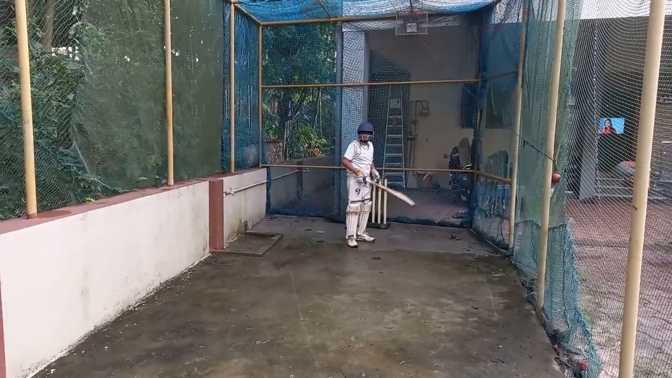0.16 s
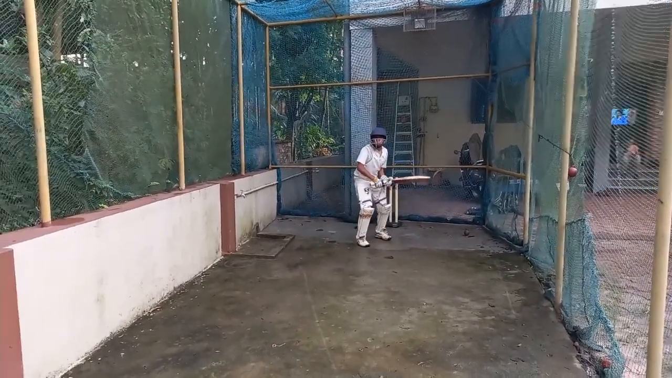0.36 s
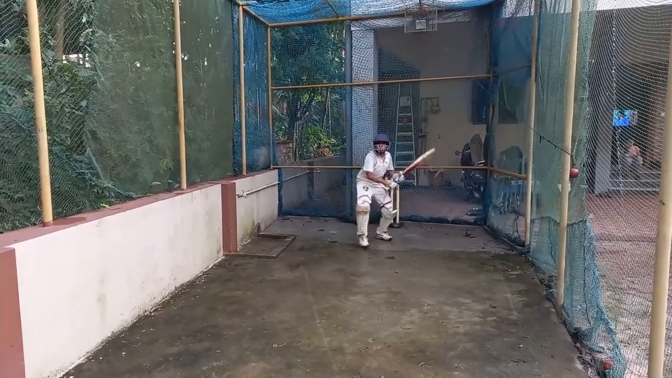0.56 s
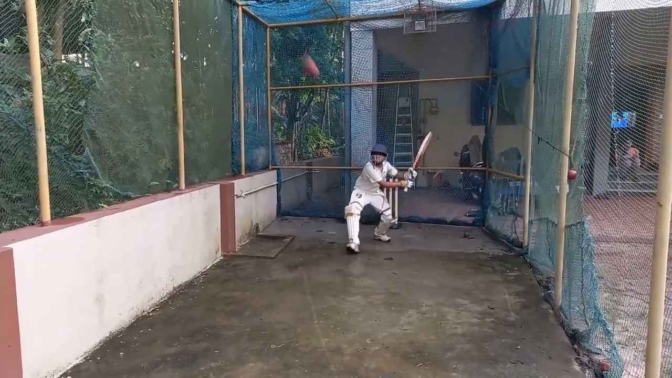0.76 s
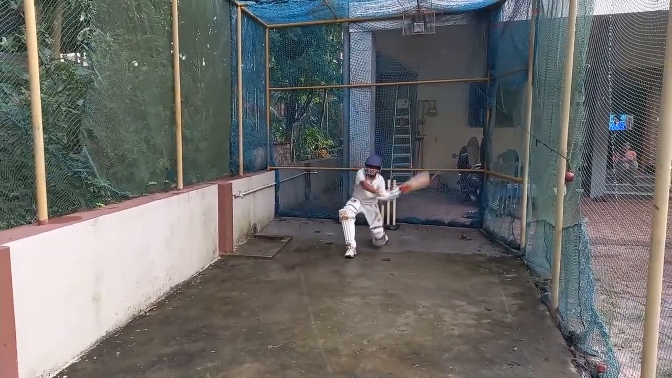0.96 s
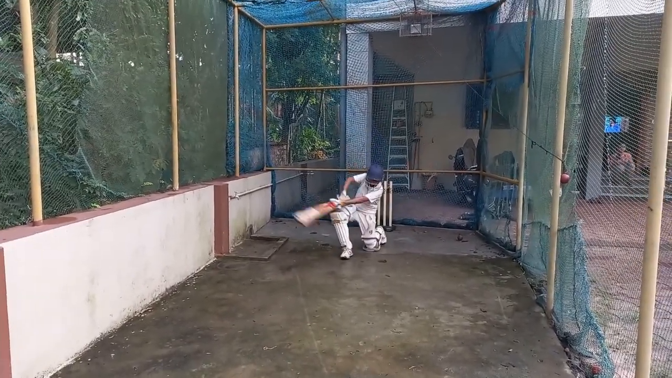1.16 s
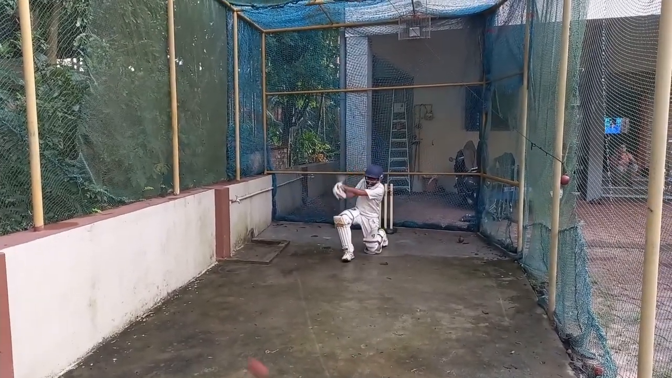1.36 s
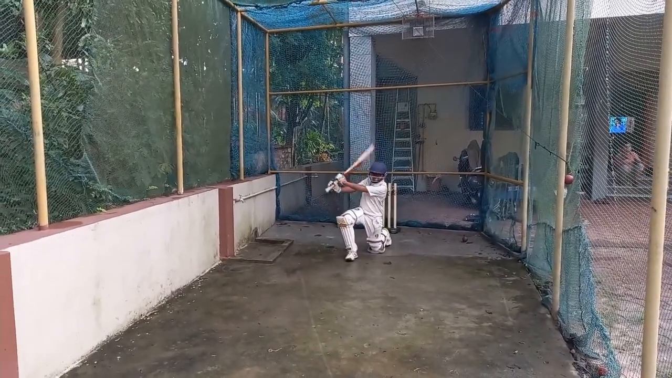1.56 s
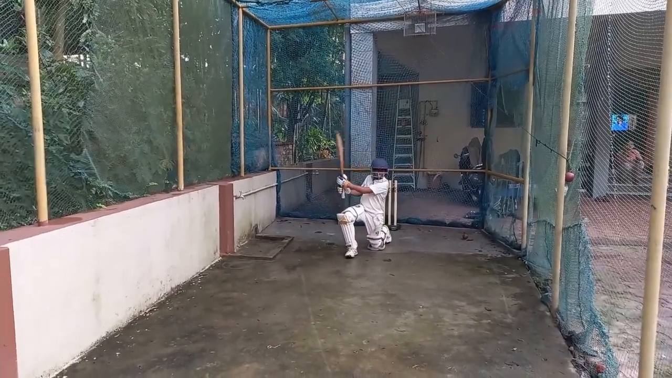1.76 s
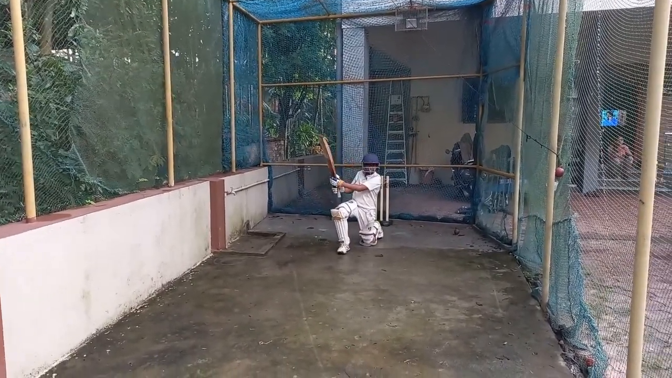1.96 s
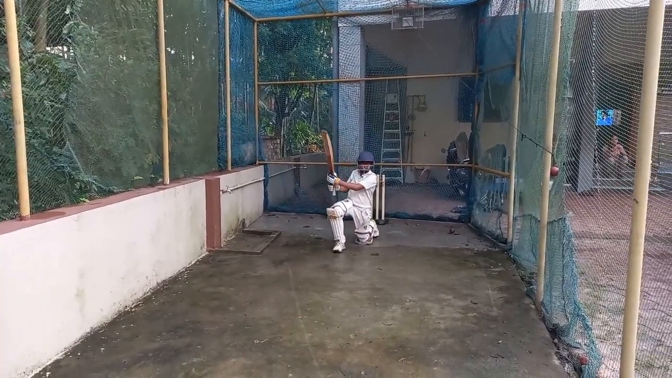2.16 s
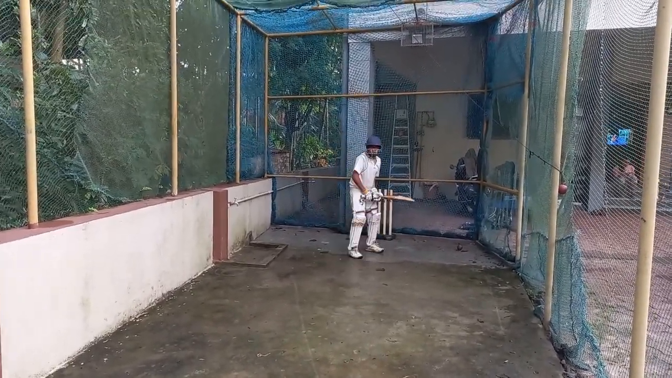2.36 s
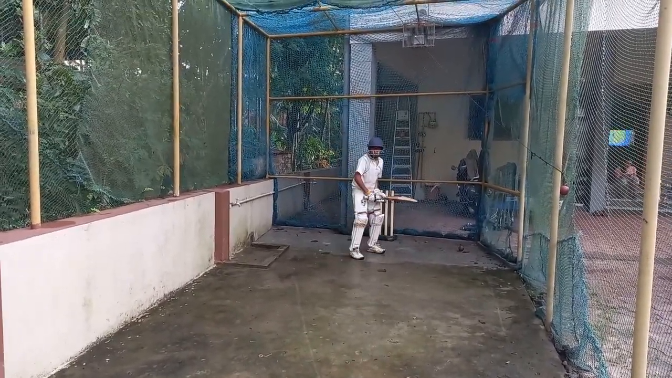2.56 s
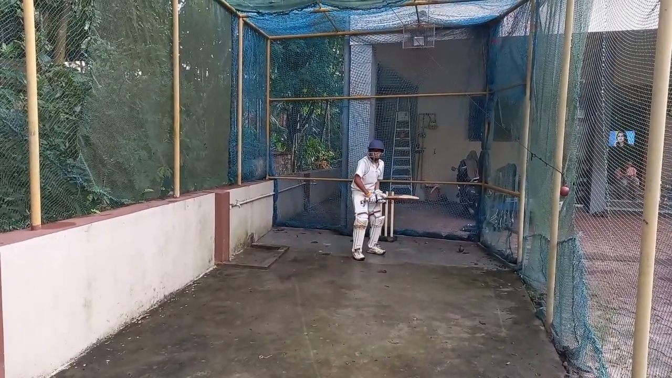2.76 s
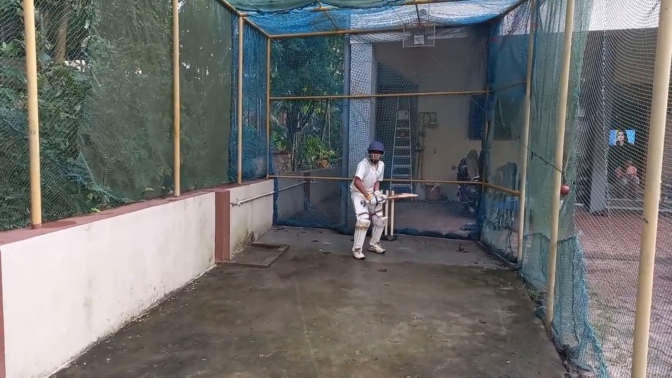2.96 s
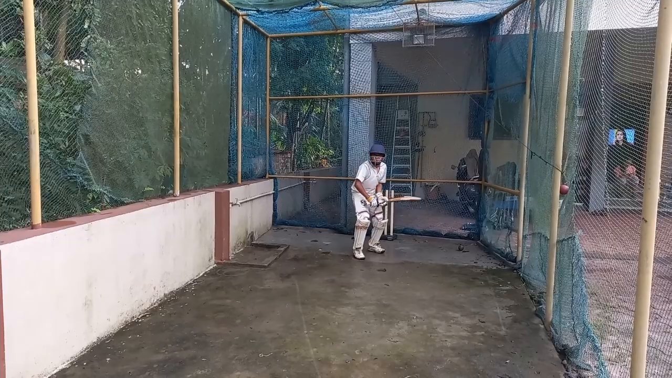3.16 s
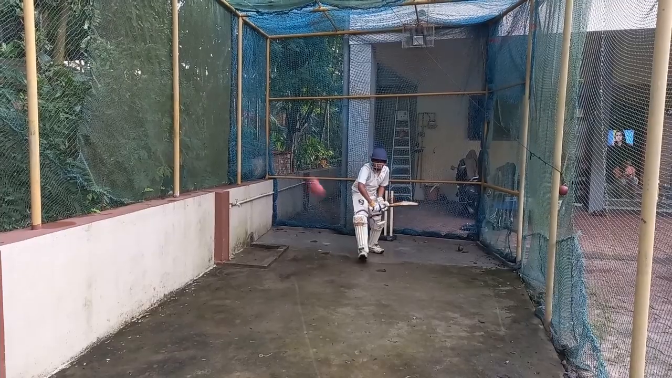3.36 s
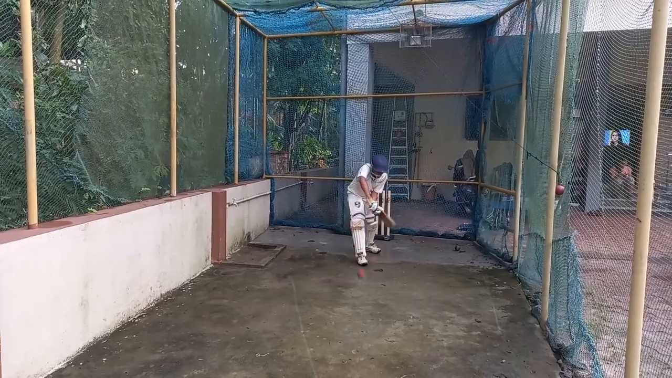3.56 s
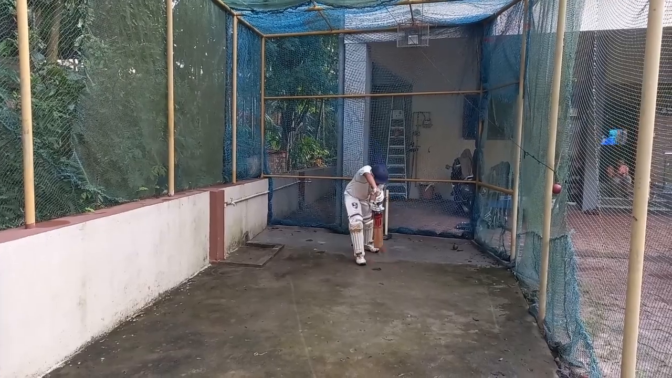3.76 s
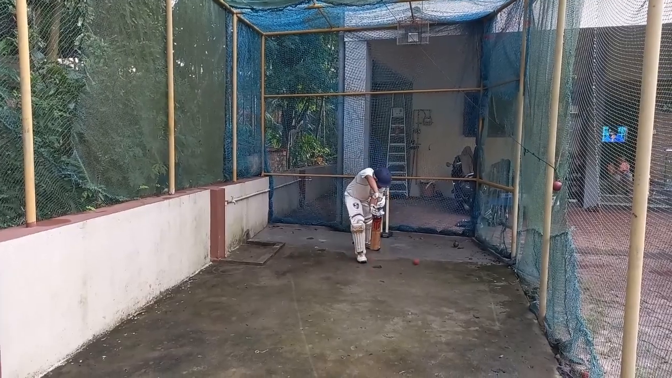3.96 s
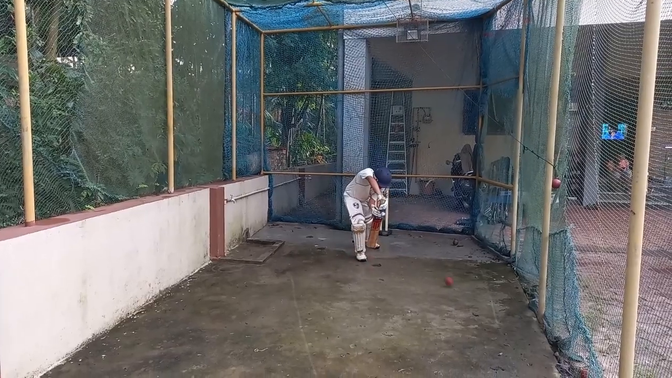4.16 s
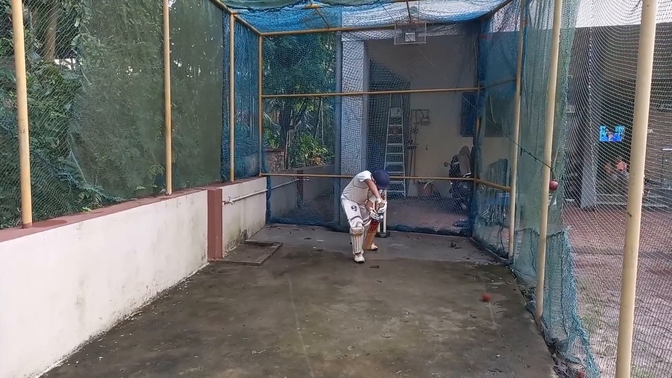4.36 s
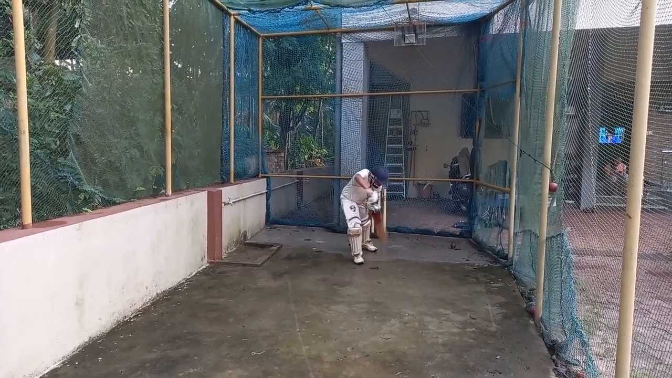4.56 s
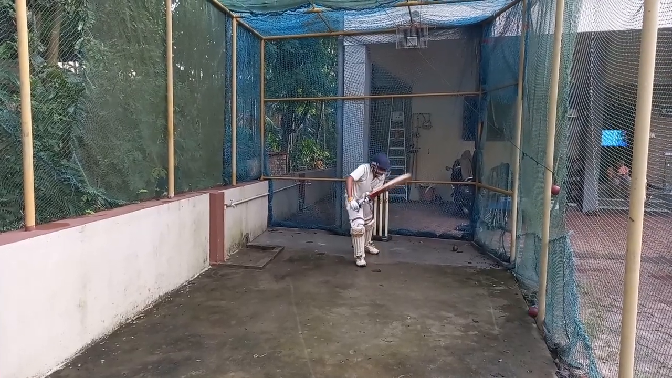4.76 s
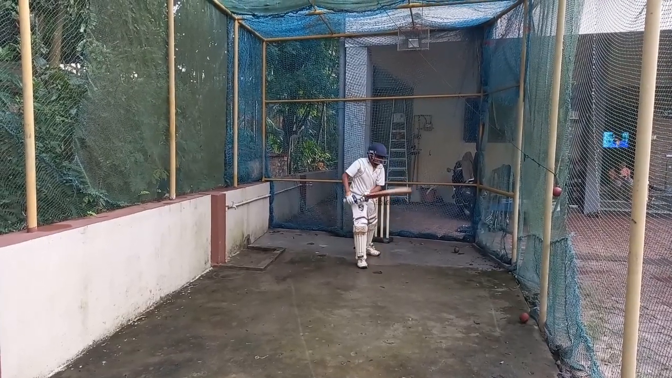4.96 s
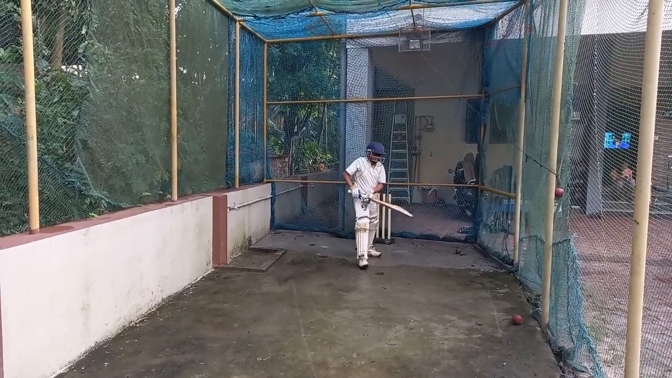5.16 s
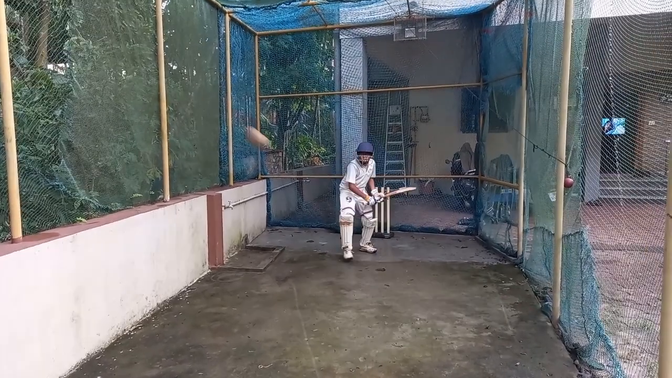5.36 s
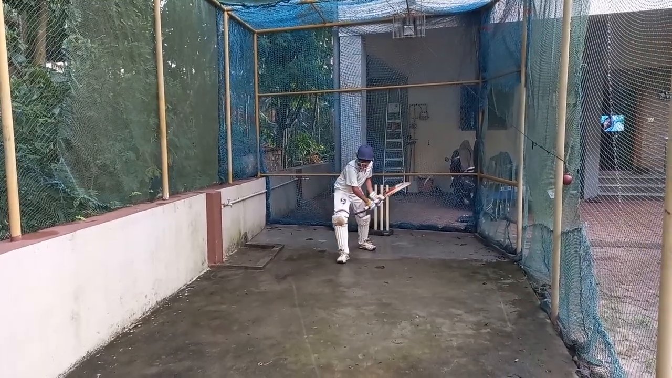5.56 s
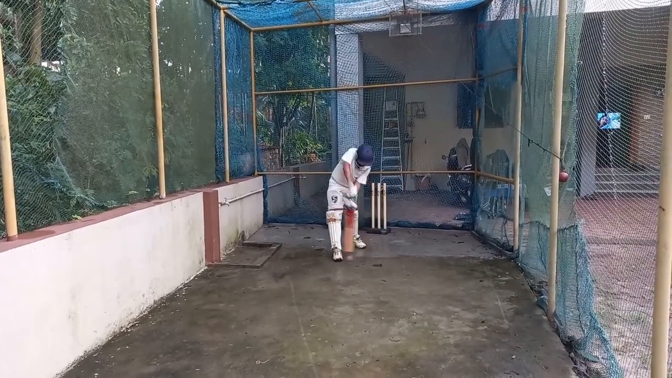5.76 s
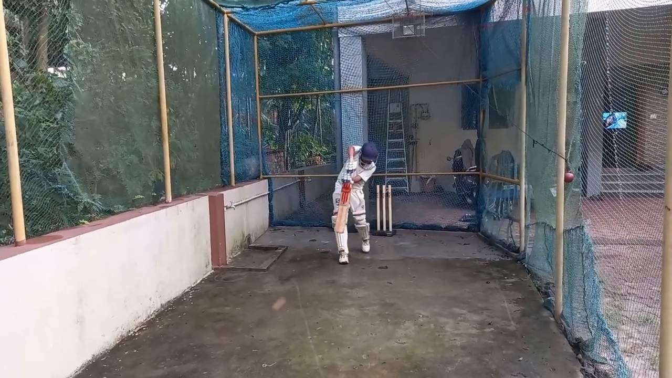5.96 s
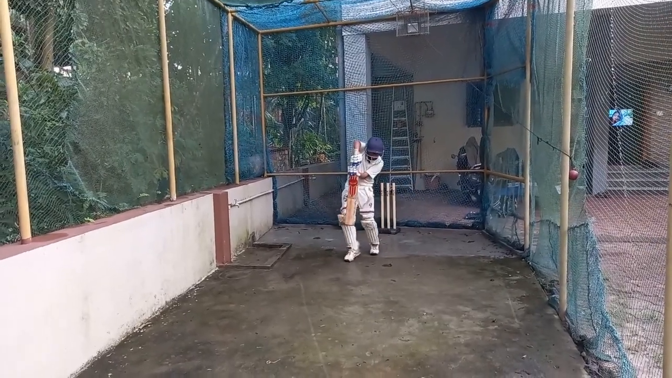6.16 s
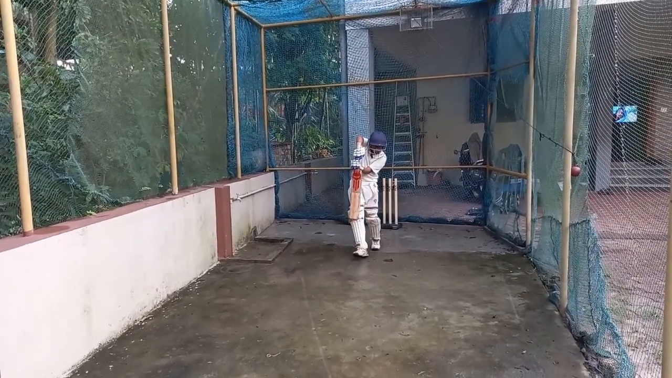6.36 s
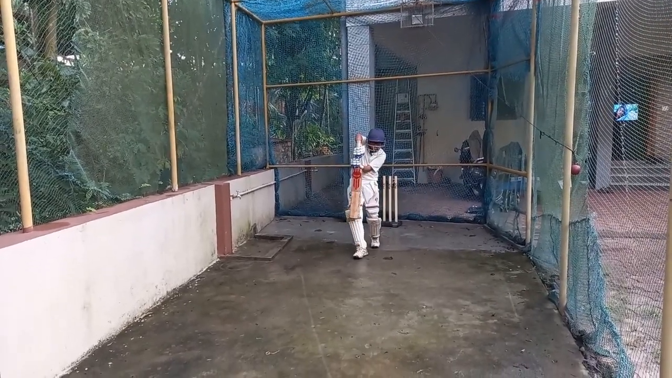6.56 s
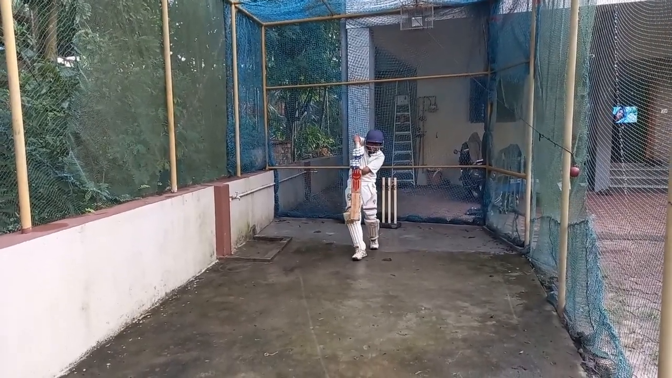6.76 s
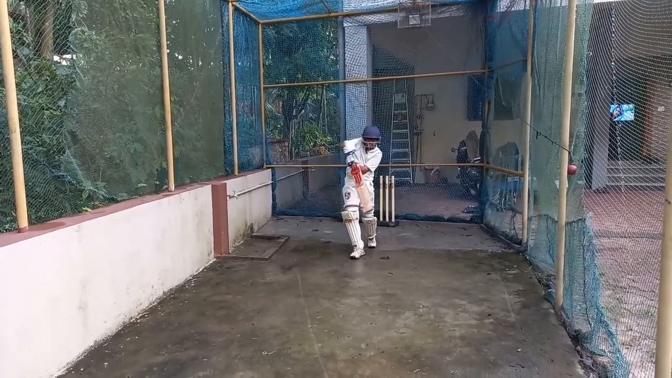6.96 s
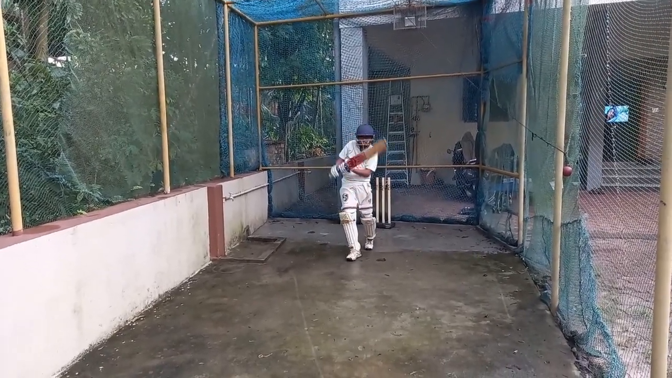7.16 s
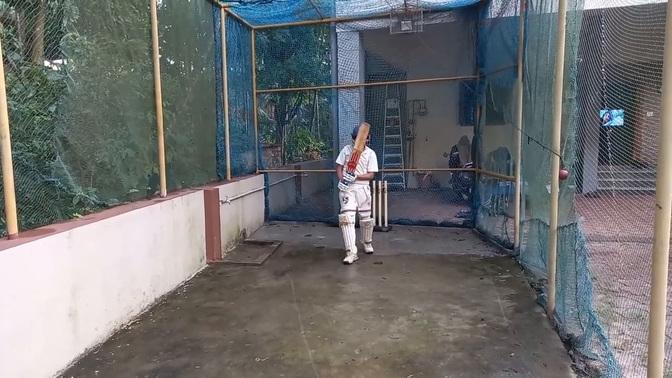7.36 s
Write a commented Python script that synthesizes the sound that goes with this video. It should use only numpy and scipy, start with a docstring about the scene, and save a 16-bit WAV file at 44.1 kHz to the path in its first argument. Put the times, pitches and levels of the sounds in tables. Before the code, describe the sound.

In a netted concrete practice lane outdoors, a far bat knocks faintly, then a near wooden bat cracks a hard ball, which bounces quickly away. Two more dry, woody cracks follow, each with wall slap and a short tail. Distant blurred whistles come after the second; scuffs, taps and low heel thuds close. Fixed stereo microphone some metres away, over quiet traffic, leafy air and insect hiss.

```python
"""A bat cracks against a ball in a netted practice lane with a concrete floor, and the ball bounces.
Blows and bounces are damped modes with a bright contact snap and a slab boom; a bat also sounds in a farther lane.
Heels thud as low modes, shoes and kit tap, and soles, pads and the swung bat rustle as grainy noise.
Wall echoes and a noise tail answer the blows, bounces, taps and whistles. Blurred tones whistle far off,
behind them shaped noise makes the traffic hum, leafy air and insect hiss."""
import sys
import numpy as np
from scipy import signal
from scipy.fft import rfft, irfft, next_fast_len
from scipy.io import wavfile
from scipy.ndimage import uniform_filter1d, map_coordinates

SR = 44100
rng = np.random.default_rng(int(sys.argv[2]) if len(sys.argv) > 2 else 0)


def wrap_up_sound(samples):
    """Save the sound to the file named by the first command line argument, as 16-bit audio."""
    columns = np.atleast_2d(samples).T
    # keep every value between -1 and 1, then stretch to whole-number steps
    tamed = np.clip(columns, -1, 1)
    steps = np.round(tamed * 32767).astype(np.int16)
    wavfile.write(sys.argv[1], SR, steps)


N = 325987


def bat_blows(out):
    """Modal excitation: the sharpness of the contact selects which modes of the blade sound."""
    # bat on ball: (time [s], body peak [dB], contact sharpness [Hz], crack [dB], crack tilt [dB/octave],
    # slab boom [dB], near echo delay [ms], near echo [dB], yard tail [dB], far walls [dB],
    # left over right [dB], left lag [ms])
    blows = [(1.148, -4.5, 950, 7.5, 1.5, -23, 3.8, 0, 4.5, 3.5, 0, 0.19),
             (3.811, 0, 820, 0.5, -1.5, -27, 3.7, -6, -8, 2, -1, -0.16),
             (5.8045, 1, 1300, -1, 2.5, -31, 3.7, -11, -1.5, 0, 0, 0.14)]
    # modes of the wooden blade: (frequency [Hz], level [dB], t60 [s])
    willow = [(296, 3, 0.0076), (450.5, 1, .01), (663, 0, 0.01), (1105, 4, 0.0051), (1397, -0.5, .005),
              (2260, -14, 0.0017)]
    for s, db, sharp_hz, *rest in blows:
        blade = np.zeros(SR // 4)
        for hz, mode_db, t60 in willow:
            octaves_off = np.log2(hz / sharp_hz)
            blade += amp(mode_db - 6 * octaves_off ** 2) * ring(hz, t60, 0.0026)
        strike(out, s, db, -blade, *rest)


def ball_bounces(out):
    """Heavily damped resonance: each bounce is a hollow knock of two modes lasting a few cycles."""
    # ball on floor, wall and posts: (time [s], body peak [dB], knock pitch [Hz], crack [dB],
    # crack tilt [dB/octave], slab boom [dB], near echo delay [ms], near echo [dB], yard tail [dB],
    # far walls [dB], left over right [dB], left lag [ms])
    bounces = [(1.2699, -6.5, 500, 11, -6, -17, 7, -14, -7.5, -2, -0.5, 0.2),
               (1.298, -21, 620, 19, -9.5, -8, 4, -17, -6, -4, -3.5, 0.14),
               (1.639, -18.5, 320, 1.5, 2.5, -32, 9, -11, -12, -6, -2.5, 0.11),
               (1.7098, -10, 680, 3.5, -2.5, -24, 10.5, -12, -12, -3, -1.5, 0.27),
               (2.1674, -26, 440, 5.5, -1.5, -26, 4, -8, -11, -5, -2, -0.22),
               (3.6799, -19.5, 470, 3, 1, -29, 4, -3, 1, 1, -1, -0.45),
               (3.9077, -13, 440, -4, 1, -26, 4, -5.5, -8, -6, -1, -0.3),
               (4.255, -28, 380, -30, 1, -33, 5, -9, -3, -5, -2, -0.26),
               (5.7785, -11, 750, 0, -2, -24, 4, -5, -2, -4, -4, -0.039),
               (6.5401, -30, 600, 11, -3, -35, 4, -10.5, -13, -5, 1.5, 0.36)]
    for s, db, hz, *rest in bounces:
        t60 = 4 / hz
        knock = ring(hz, t60, .8 / hz) + .3 * ring(1.7 * hz, t60, .5 / hz)
        strike(out, s, db, -knock, *rest)


def far_bat(out):
    """Reverberant field: a bat in a farther lane is heard mostly through the walls, as a hollow colour."""
    # one blow: time [s], level [dB], then its colour as rows of (frequency [Hz], level [dB])
    far_blow = (.403, -26, [(200, -27), (340, -12.5), (445, 4), (560, -6), (710, -1), (830, -19),
                (1000, -14), (1400, -24), (1800, -48.5), (5000, -53)])
    s, db, colour = far_blow
    click = filtered(np.arange(SR // 20) == 400, lambda hz: amp(along(colour, hz)))
    click /= np.abs(click).max()
    answered = yard(0.41 * click, click, wet_db=17.5, slow=1.56, early=0.54)
    add(out, s - .009, amp(db) * answered)  # the click is centred 9 ms into its buffer


def strike(out, s, db, body, crack_db, tilt_db, boom_db, echo_ms, echo_db, wet_db, facade_db, pan_db, lag_ms):
    """Impact: body ring and contact snap radiate into the yard while the slab booms."""
    body = body / np.abs(body).max()
    snap, click = amp(crack_db) * burst(.005, tilt_db)
    feed = smooth(body) + 0.72 * click
    answered = yard(body + snap, feed, wet_db, lag_ms, echo_db, echo_ms, facade_db)
    add(out, s, amp(db) * answered, pan_db)
    add(out, s, amp(db + boom_db) * slab_boom(), pan_db=0)


def slab_boom():
    """Diffuse low vibration: the struck slab gives a decaying band of bass noise."""
    # slab spectrum, relative: (frequency [Hz], density [dB per Hz])
    slab = [(25, -45), (55, -15), (82, 0), (105, -6), (140, -6), (220, -20), (400, -60)]
    t60_s, rise_s, likeness = .38, .008, .75
    t = np.arange(SR // 2) / SR
    boom = unit(paired(rng.standard_normal((2, len(t))), [(100, likeness)], slab))
    return amp(-60 * t / t60_s) * (1 - np.exp(-t / rise_s)) * boom


def burst(t60, tilt_db=0):
    """Hard contact excites a wide band: a noise snap, and a click of equal energy without its chance ripples."""
    # contact colour before the tilt: (frequency [Hz], level [dB])
    crack = [(600, -29), (1800, 2), (3000, 1), (4200, -1), (6200, -1.5), (8000, -8.5), (11000, -8),
             (16000, -17)]
    t = np.arange(SR // 4) / SR

    def colour(hz):
        octaves = np.log2((hz + 1) / 4000)
        return amp(along(crack, hz) + tilt_db * octaves)

    snap = unit(filtered(rng.standard_normal(len(t)) * amp(-60 * t / t60), colour))
    click = unit(filtered(np.arange(len(t)) == 200, colour))
    return np.array([snap, click]) / 70


def ring(hz, t60, attack):
    """Damped mode: a sine that builds up, then decays exponentially, a quarter of a second long."""
    t = np.arange(SR // 4) / SR
    return np.sin(2 * np.pi * hz * t) * amp(-60 * t / t60) * (1 - np.exp(-t / attack))


def smooth(knock):
    """Scattering evens out fine spectrum: a click with only the broad colour of the knock."""
    power = uniform_filter1d(np.abs(rfft(knock)) ** 2, size=40)
    return np.roll(irfft(np.sqrt(np.abs(power)), len(knock)), 200)


def yard(knock, feed, wet_db, lag_ms=0, echo_db=-8, echo_ms=3.7, facade_db=-5, slow=1, early=0.58):
    """Reflection and reverberation: discrete echoes of the knock, and a fresh lumpy tail of the feed."""
    # decay of the tail before the factor slow: (frequency [Hz], t60 [s])
    yard_decay = [(60, 0.73), (250, 0.66), (700, 0.71), (2000, 0.71), (6000, 0.67), (15000, 0.58)]
    # left-right likeness of the tail: (frequency [Hz], likeness [0-1])
    tail_likeness = [(100, 0.93), (500, 0.84), (1500, 0.056), (5000, 0.049)]
    # wall echoes before the tail and far-wall levels are added: (time [s], level [dB])
    wall_echoes = [(.018, -24.5), (0.043, -17.5), (.0455, -11), (.048, -8), (.051, -16), (.072, -13.5)]

    hz, t, z = signal.stft(rng.standard_normal((2, SR)), SR, nperseg=256)
    rise = 1 - (1 - early) * np.exp(-(t / 0.028) ** 2)  # builds up as the far buildings answer
    # single surfaces, above all one large facade, stand out
    facade_bump = max(3 + facade_db, 0) * np.exp(-((t - .046) / 0.0046) ** 2)
    lumps = amp(2.4 * rng.standard_normal(len(t)) + facade_bump)
    decay = amp(-60 * t / slow / along(yard_decay, hz)[:, None])
    tail = signal.istft(z * rise * lumps * decay, SR, nperseg=256)[1]
    tail = paired(tail, tail_likeness, [(100, 0)])
    tail = amp(wet_db) * tail / np.linalg.norm(tail[0])

    far = np.zeros_like(tail)
    for s, db in wall_echoes:
        scatter = rng.integers(-12, 13, size=2)  # samples, left and right apart
        far[[0, 1], round(s * SR) + scatter] += amp(db + wet_db + facade_db)
    paths = filtered(far, lambda hz: 1 / (1 + (hz / 1400) ** 2))  # rough walls return little treble
    lag = round(lag_ms * SR / 1000)
    paths[[0, 1], [max(lag, 0), max(-lag, 0)]] += 1  # direct sound
    paths[[0, 1], round(echo_ms * SR / 1000) + rng.integers(-6, 7, size=2)] += amp(echo_db)
    echoes = signal.fftconvolve(knock[None], paths, axes=1)
    return echoes + signal.fftconvolve(feed[None], tail, axes=1)


def footsteps(out):
    """Low modal impact: each heel on the concrete is two damped modes."""
    # heels: (time [s], level [dB], pitch [Hz], t60 of the lower mode [s])
    steps = [(2.568, -40, 92.9, 0.17), (6.142, -25.5, 94, 0.15), (6.221, -27, 88, 0.09),
             (6.335, -26, 99, 0.15), (6.92, -42.5, 96, 0.21), (7.114, -18.5, 98.3, 0.093),
             (7.301, -18.5, 95, 0.088), (7.348, -27, 96, 0.13)]
    for s, db, hz, t60 in steps:
        thud = ring(hz, t60, 0.014) + 0.48 * ring(1.54 * hz, 0.32 * t60, 0.0038)
        add(out, s, amp(db) * thud)


def taps(out):
    """Light contact: shoes and kit give a broadband snap over a short low knock."""
    # taps: (time [s], level [dB], tilt [dB/octave], low knock [dB], left over right [dB])
    small_taps = [(0.183, -30, -1, -36, -2), (2.738, -37, -4, -24, 0), (3.3423, -33, -4, -18, -6.5),
                  (3.4564, -33, 0, -27, -9.5), (3.487, -38, -1.5, -27, -7.5), (5.0466, -45, -3, -18, -4.5),
                  (6.333, -29, -6, -34, -0.5), (6.3922, -27, -5, -22, 0), (6.488, -30, -3, -19, -1),
                  (6.686, -26, -7, -22, -3), (7.1085, -39, -3, -13, -13)]
    for s, db, tilt_db, low_db, pan_db in small_taps:
        snap, click = burst(0.013, tilt_db)
        knock = snap + amp(low_db) * ring(350, 0.028, 0.00068)
        add(out, s, amp(db) * yard(knock, click, wet_db=-1.5), pan_db)


def rustling(out):
    """Friction noise: random grain modulates a soft band and bright grit as soles, pads and the bat move."""
    # scuffs: (loudest time [s], soft level [dB], soft centre [Hz], grit against soft [dB],
    # swell by 20 dB [s], fade by 20 dB [s])
    rustle = [(0.01, -54, 3200, -4, 0.019, 0.033), (0.186, -50, 3200, 0, 0.036, 0.032),
              (0.628, -58.5, 2800, -8, 0.16, .05), (0.914, -60, 3600, 0, .14, 0.17),
              (1.1, -48.5, 2500, -1, .008, 0.22), (2.74, -52, 3800, -14, .04, .02),
              (3.298, -56, 3000, -8, .015, .04), (3.36, -53, 3300, -18, .025, 0.087),
              (3.468, -54, 3600, 0, .025, 0.1), (5.054, -57.5, 3000, -10, 0.022, .22),
              (5.39, -63, 3000, -5.5, 0.012, 0.095), (5.77, -51, 2000, -8, 0.13, .01),
              (6.144, -42, 2200, -5, .03, .045), (6.383, -43, 3200, -14, 0.039, 0.047),
              (6.83, -54, 3800, -22, 0.065, 0.096), (6.91, -44.5, 3400, -14, .1, .07),
              (7.03, -54, 2800, -13, .2, .28), (7.38, -56, 2300, -20, 0.085, .05)]
    spread_octaves = .62  # of the soft layer about its centre
    grain = amp(1.8 * wobble(60) + 2.2 * wobble(440))
    cloth = grain * rush([(300, -10), (1000, 0), (16000, 0)], patchy_db=1.8)
    grit_spectrum = [(2500, -33), (5000, -5.5), (7000, -7.5), (11000, -10.0), (16000, -20.0)]
    grit = grain * rush(grit_spectrum, patchy_db=0)
    for s, db, centre_hz, treble_db, rise_s, fall_s in rustle:
        band = lambda hz: 1 / (1 + (np.log2((hz + 1) / centre_hz) / spread_octaves) ** 4)
        soft = unit(filtered(cloth, band))
        out += amp(db) * swell(s, rise_s, 0, fall_s) * (soft + amp(treble_db) * grit)


def swell(s, rise_s, hold_s, fall_s):
    """Exponential envelope: climbs 20 dB per rise to time s, holds, then sinks 20 dB per fall."""
    t = np.arange(N) / SR - s
    spans_down = np.maximum(-t / rise_s, (t - hold_s) / fall_s)
    return amp(-20 * np.maximum(spans_down, 0))


def whistles():
    """Random modulation: distance and moving air blur steady notes into narrow noise."""
    # far whistled notes: (start [s], pitch [Hz], level [dB], hold [s], fade by 20 dB [s])
    notes = [(0.04, 1977, -66, .05, 0.04), (0.17, 1335, -72, 0.066, 0.23), (1.93, 2520, -67, .02, 0.1),
             (2.08, 2570, -72, .04, 0.4), (3.65, 2850, -62, .03, .2), (3.91, 2945, -52.5, .025, .035),
             (3.97, 2880, -50.5, .045, .03), (4.08, 2956, -52.5, .07, .15), (4.18, 2860, -60, 0.054, .22),
             (4.43, 2960, -69, .025, .04), (4.51, 2950, -73, .06, .15), (4.82, 2510, -70, 0.13, 0.26)]
    attack_s, blur_rate = .025, 150  # climb by 20 dB [s]; random knots per second
    dry, t = np.zeros(N), np.arange(N) / SR
    for s, hz, db, hold_s, fade_s in notes:
        blur = 0.9 + wobble(blur_rate) + 1j * wobble(blur_rate)
        tone = np.real(blur * np.exp(2j * np.pi * hz * t))
        dry += amp(db) * swell(s + attack_s, attack_s, hold_s, fade_s) * tone
    return yard(dry, dry, wet_db=-9)[:, :N]


def traffic_and_air():
    """Spectrally shaped noise: traffic hum and leafy air follow slow level curves."""
    # background levels before the hum's wobble and the lean: (time [s], traffic [dB], air [dB])
    around = [(0, -60, -66.5), (.36, -57.5, -67), (.55, -55.5, -61.5), (1.05, -56, -66),
              (2.1, -62.5, -67.5), (2.5, -58.5, -66), (4.3, -59, -62.5), (5.1, -58.5, -64), (5.6, -58, -70),
              (6.3, -49.5, -66), (6.7, -57, -65), (7.39, -53.5, -69.5)]
    # relative spectra: (frequency [Hz], density [dB per Hz])
    traffic_spectrum = [(15, -61), (25, -35.5), (65, -6.5), (86, -1), (167, -14.5), (243, -14),
                        (386, -22.5), (462, -22.5), (524, -23.5), (1800, -34.5), (2340, -58), (3960, -120)]
    air_spectrum = [(700, -43.5), (1200, -11.5), (1750, -9), (2250, 1.5), (3100, -5), (4300, -2),
                    (5200, -8.5), (6500, -6), (7700, -14.5), (9700, -11), (10600, -25.5), (16000, -24.5)]
    # stereo balance: (frequency [Hz], left over right [dB])
    lean = [(60, -1), (240, -3.5), (950, -1.5), (3770, -5.5), (15000, 8)]
    traffic_db, air_db = curves(around)
    hum = amp(traffic_db + 0.64 * wobble(2.6)) * rush(traffic_spectrum, patchy_db=-0.5)
    air = amp(air_db) * rush(air_spectrum, patchy_db=.6)
    return filtered(hum + air, lambda hz: amp(along(lean, hz) * [[.5], [-.5]]))


def insects():
    """Narrow-band noise: the insects make a steady high hiss."""
    # relative spectrum: (frequency [Hz], density [dB per Hz])
    insect_spectrum = [(4710, -46.5), (8000, -17.5), (8410, -15), (8470, -5), (9110, 6), (9520, -0.5),
                       (10400, -20), (13500, -51.5), (22000, -120)]
    return amp(-67.5) * rush(insect_spectrum, patchy_db=0.7)


def rush(spectrum, patchy_db):
    """Modulated random noise: stereo, of rms 1, with patches of random gain in time and frequency."""
    # left-right likeness: (frequency [Hz], likeness [0-1])
    noise_likeness = [(60, 0.98), (240, 0.94), (950, 0.09), (3770, 0.041), (15000, 0.16)]
    z = signal.stft(rng.standard_normal((2, N)), nperseg=512)[2]
    field = uniform_filter1d(rng.standard_normal(z.shape[1:]), 6, 0)
    field = uniform_filter1d(field, 12, 1)
    patchy = signal.istft(z * amp(patchy_db * unit(field)), nperseg=512)[1][:, :N]
    return unit(paired(patchy, noise_likeness, spectrum))


def paired(pair, alike, colour):
    """Interaural coherence: two unrelated sounds blend into left and right of a given likeness."""
    turn = lambda hz: np.arccos(np.clip(along(alike, hz), -1, 1)) / 2
    blend = lambda hz: amp(along(colour, hz)) * [np.cos(turn(hz)), np.sin(turn(hz))]
    mid, side = filtered(pair, blend)
    return np.array([mid + side, mid - side])


def add(out, s, sound, pan_db=0):
    """Superposition: mixes a sound in from time s, leaning left (positive) or right."""
    part = out[:, round(s * SR):][:, :sound.shape[-1]]
    part += (amp([[pan_db / 2], [-pan_db / 2]]) * sound)[:, :part.shape[1]]


def filtered(x, response):
    """Linear filtering: the spectrum of x times a response of frequency."""
    m = next_fast_len(x.shape[-1] + 8192)
    return irfft(rfft(x, m) * response(np.fft.rfftfreq(m, 1 / SR)), m)[..., :x.shape[-1]]


def wobble(rate):
    """Band-limited randomness: a smooth random curve, rate knots a second."""
    return map_coordinates(rng.standard_normal(int(N * rate / SR) + 4), [np.arange(N) * rate / SR])


def curves(rows):
    """Linear interpolation: one value per sample for each column after the time."""
    s, *cols = np.transpose(rows)
    return [np.interp(np.arange(N) / SR, s, c) for c in cols]


def along(points, hz):
    """Interpolation of (frequency [Hz], value) points on a logarithmic frequency axis."""
    f, v = np.transpose(points)
    return np.interp(np.log(hz + 1), np.log(f + 1), v)


def unit(x):
    """Power normalisation: x at rms 1."""
    return x / np.sqrt(np.mean(x ** 2) + 1e-20)


def amp(db):
    """Logarithmic level: decibels as an amplitude gain."""
    return 10 ** (np.asarray(db) / 20)


def gain_control(x):
    """Level feed-forward: loud sound lowers the gain, which returns once the remembered level has sunk."""
    depth_db, threshold_db, span_db = 2, -51, 10  # full depth is reached one span above threshold
    memory_s, glide_s = 0.14, 0.44
    keep = np.exp(-1 / (memory_s * SR))
    power = signal.lfilter([1 - keep], [1, -keep], np.mean(x ** 2, axis=0))
    level_db = 10 * np.log10(power + 1e-12)
    excess = np.clip((level_db - threshold_db) / span_db, 0, 1)
    glide = np.exp(-1 / (glide_s * SR))
    return x * amp(-depth_db * signal.lfilter([1 - glide], [1, -glide], excess))


def scene():
    """Superposition: the sum of all sources at the two microphones."""
    out = np.zeros((2, N))
    for source in (bat_blows, ball_bounces, far_bat, footsteps, taps, rustling):
        source(out)
    return out + whistles() + traffic_and_air() + insects()


def record(dry):
    """Transduction: deep bass drops, gain dips with loud sound, peaks round off and the band is limited."""
    thin = filtered(dry, lambda hz: (1j * hz / (44 + 1j * hz)) ** 2)
    steadied = gain_control(thin)
    rounded = steadied / (1 + np.abs(steadied) ** 6) ** (1 / 6)
    top_hz = 16200
    return filtered(rounded, lambda hz: 1 / (1 + (hz / top_hz) ** 120))


dry = scene()
out = record(dry)
wrap_up_sound(out)
```